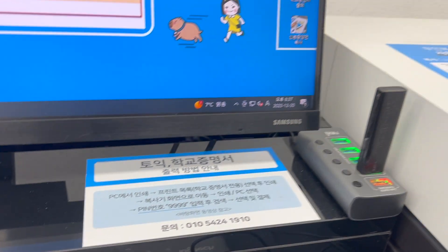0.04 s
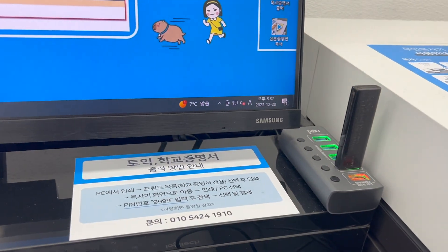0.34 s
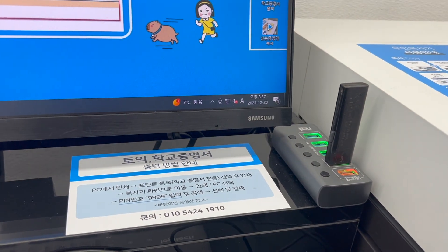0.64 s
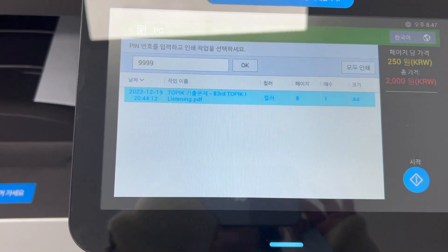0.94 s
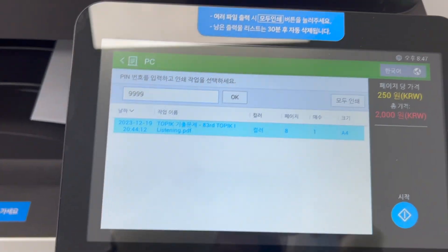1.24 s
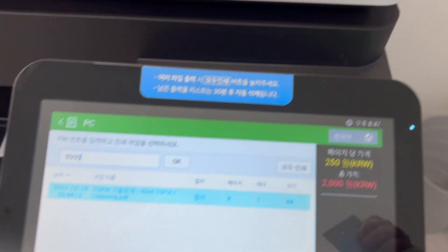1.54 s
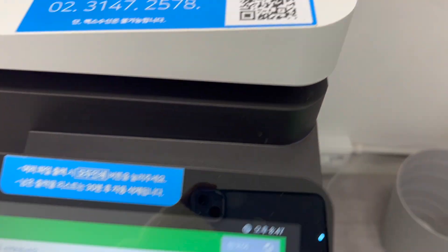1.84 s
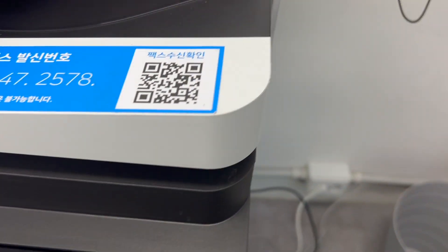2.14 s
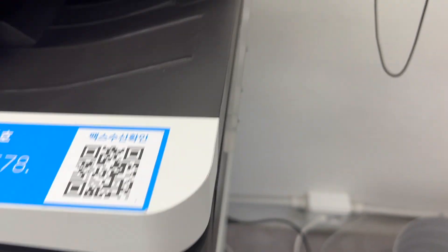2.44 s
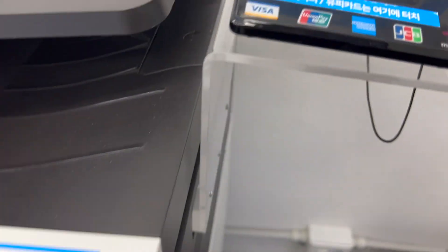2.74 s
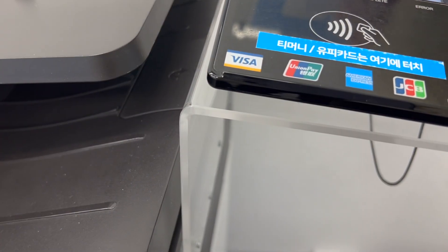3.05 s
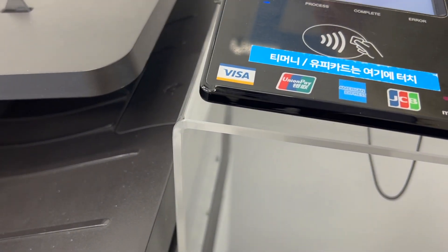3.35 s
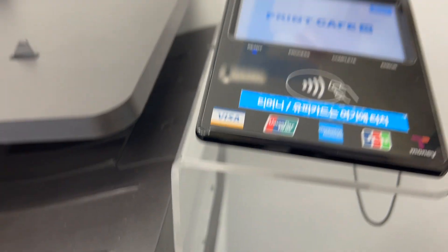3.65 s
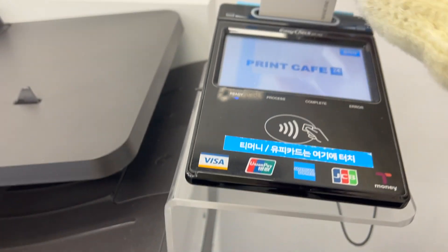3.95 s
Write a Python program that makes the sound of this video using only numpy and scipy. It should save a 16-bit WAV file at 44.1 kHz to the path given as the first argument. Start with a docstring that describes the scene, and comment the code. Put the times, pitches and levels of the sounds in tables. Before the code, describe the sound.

A copier whirs and whines close by, following a moment of soft ventilation hum in a small shop. Its motors start and stop as rollers feed a sheet, with dull knocks, sharp plastic clicks and a brief squeaky paper scrape.

```python
"""A small print shop heard from a hand-held phone. First a quiet room hum and a fading hiss, with one
sharp click at 0.7 s. After a brief silence, a copier from close by: fans and a drive whine run, motors
start and stop, rollers whir, paper slides through, and plastic parts click and thud. From 3.3 s the
paper scrapes and squeaks; near 3.7 s the whine drops away."""
import sys
import numpy as np
from scipy import signal
from scipy.fft import rfft, irfft
from scipy.io import wavfile
from scipy.ndimage import uniform_filter1d

SR = 44100
rng = np.random.default_rng(int(sys.argv[2]) if len(sys.argv) > 2 else 0)


def generate_wav(signal):
    """Clip the signal to [-1, 1] and save it as 16-bit WAV at the path in sys.argv[1]."""
    frames = np.transpose(np.atleast_2d(signal))
    scaled = np.clip(frames, -1, 1) * 32767
    pcm = np.round(scaled).astype(np.int16)
    wavfile.write(sys.argv[1], SR, pcm)


N = 176400
T = np.arange(N) / SR
HZ = np.maximum(np.arange(N // 2 + 1) * SR / N, 1)


# roller spectrum (frequency [Hz], density [dB])
ROLLER_SPECTRUM = [(50, -12), (92, 3), (125, -6), (170, -7), (260, 5.5), (450, -2), (620, -2.5), (800, -5),
                   (1150, -7), (1500, -16), (2500, -26.5), (6000, -61)]
# roller whir (time [s], level [dB])
ROLLER_LEVEL = [(.82, -41), (1.07, -44.5), (1.25, -46), (1.42, -44.5), (1.52, -44.5), (1.6, -44.5),
                (1.85, -47), (2.05, -46), (2.25, -47), (2.38, -43.5), (2.5, -43), (2.62, -47),
                (2.78, -44.5), (2.92, -51), (3.5, -49.5), (4, -57)]

def rollers():
    """Feed rollers rattle finely into a whir."""
    return curve(ROLLER_LEVEL) * noise(response(ROLLER_SPECTRUM), grain=0.39)


# motor runs (start [s], end [s], pitch [Hz], level [dB], run-down [s], pitch lost [fraction])
MOTOR_RUNS = [(.8, 1.12, 865, -54.5, .03, .01), (.8, 1.1, 490, -52, .03, .01),
              (1.02, 1.48, 515, -50.5, .03, .002), (1.56, 1.99, 517, -49, .29, .09),
              (.8, 1.17, 330, -49.5, .03, .005), (1.15, 1.48, 333.5, -43, .05, .005),
              (1.46, 1.8, 334, -51, .2, .02), (2.1, 2.28, 333, -47.5, .04, .01),
              (1.79, 1.96, 260, -46, .05, .02), (1.93, 2.06, 224, -47.5, .1, .04),
              (2.21, 2.32, 260, -47, .05, .01), (2.45, 2.57, 262, -42, .03, .005),
              (2.56, 2.74, 263, -51, .05, .01), (2.42, 2.74, 624, -52, .04, .01),
              (2.73, 3.0, 115, -47.5, .15, .02), (3.1, 3.66, 116, -50, .35, .07),
              (3.7, 4.1, 204, -55, .05, .01), (.95, 1.78, 3110, -69, .05, .002)]

def motors():
    """Each motor comes in, holds its speed and sags as it stops."""
    out, attack_s, release_s = 0, 0.025, 0.03
    for start, end, hz, db, run_down_s, sag in MOTOR_RUNS:
        slowing = ramp(end - run_down_s, run_down_s)
        gate = ramp(start, attack_s) * np.clip((end - T) / release_s, 0, 1)
        out += undb(db) * gate * tone(hz * (1 - sag * slowing ** 2), wow=0.0045, flutter_db=2.2)
    return out


# sliding paper spectrum (frequency [Hz], density [dB])
PAPER_SPECTRUM = [(400, 1.5), (1200, 9), (2200, 2.5), (3200, 0.5), (4500, -2), (7000, 0), (10000, -6),
                  (15500, -2.5)]
# sliding paper (time [s], level [dB])
PAPER_LEVEL = [(.82, -56), (1.3, -57.5), (1.5, -48), (1.58, -50.5), (1.65, -45.5), (1.72, -54.5),
               (1.88, -57.5), (2.05, -53), (2.13, -54.5), (2.25, -55), (2.33, -52), (2.75, -50),
               (2.88, -53), (3.05, -62), (3.3, -60), (3.65, -56.5), (3.72, -58), (3.82, -63.5)]

def paper_slide():
    """The sheet hisses as it slides through."""
    return curve(PAPER_LEVEL) * noise(response(PAPER_SPECTRUM), grain=0.11)


# flick spectrum (frequency [Hz], density [dB])
FLICK_SPECTRUM = [(800, -6), (2000, 14.5), (4500, 13), (8000, 12), (13000, 9.5), (15800, -15)]
# edge flicks (time [s], level [dB], decay [s], extra treble [dB])
EDGE_FLICKS = [(1.535, -38, 0.011, 10), (1.633, -48, .012, -4), (1.65, -45, 0.015, -3),
               (2.157, -43.5, 0.042, -14), (3.392, -39.5, 0.0045, 3), (3.412, -46, 0.01, 6),
               (3.545, -38, .003, 5), (3.558, -47, 0.0063, 5), (3.5645, -40, .003, 3)]

def paper_flicks():
    """The sheet's edge snaps past guides, some flicks crisper than others."""
    out, rise_s, treble_hz = 0, 0.00078, 7800
    grit = noise(response(FLICK_SPECTRUM), grain=0.35)
    treble = irfft(rfft(grit) / (1 + (treble_hz / HZ) ** 4), N)
    for start, db, tau_s, treble_db in EDGE_FLICKS:
        scratch = unit(grit + (undb(treble_db) - 1) * treble)
        out += undb(db) * ramp(start, rise_s) * decay(start, tau_s) * scratch
    return out


# grit of scrapes and click cracks (frequency [Hz], density [dB])
GRIT_SPECTRUM = [(500, -2.5), (1500, 2.5), (2400, -10.5), (3300, -5.5), (4300, -2), (5400, -2),
                 (7500, -7.5), (10000, -9.5), (15500, -17)]
# strokes (start [s], length [s], grit level [dB], squeak [Hz], squeak level [dB])
SCRAPE_STROKES = [(3.343, 0.086, -55, 4400, -63), (3.39, 0.054, -49.5, 5140, -50),
                  (3.415, 0.018, -61, 7030, -48.5), (3.453, 0.034, -57.5, 4900, -57),
                  (3.506, 0.049, -49.5, 4980, -47), (3.537, 0.03, -47, 4500, -57),
                  (3.552, 0.017, -61, 6600, -37.5), (3.554, 0.024, -47, 3780, -42),
                  (3.577, 0.019, -46.5, 3840, -41.5), (3.57, 0.022, -44, 2980, -44.5)]

def paper_scrapes():
    """Paper rubs grittily, each stroke with a rough squeak."""
    out, grit = 0, noise(response(GRIT_SPECTRUM), grain=0.4)
    for start, length_s, db, squeak_hz, squeak_db in SCRAPE_STROKES:
        squeak = noise(resonance(squeak_hz, width_hz=380), grain=0.35)
        out += swell(start, length_s) * (undb(db) * grit + undb(squeak_db) * squeak)
    return out


# plastic modes (frequency [Hz], level [dB], t60 [s])
PLASTIC_MODES = [(910, -5, 0.03), (1282, -5.5, 0.02), (1552, -3, 0.018), (1890, -7.5, 0.0024),
                 (4340, -16.5, 0.013), (5230, -5.5, 0.0074), (8600, -23.5, 0.014)]
# contacts (time [s], level [dB], first mode [dB], second mode [dB], bright modes and crack [dB],
# left minus right [dB], pitch [ratio], ring length [ratio])
PLASTIC_CLICKS = [(.223, -51, 8, 4, -11, -6, 0.92, .8), (0.7115, -24, -10, 1, -20.5, 4.5, 0.84, .55),
                  (2.3082, -43, 17, 1, -18, -2, 0.94, 0.47), (3.0492, -16, -14, 0, -3, -1.5, 1.005, 0.94),
                  (3.392, -34, -9, 0, -8, -1, 1, 1.1), (3.589, -18, -0.5, -4, -6, -3, 1, 1.17)]

def clicks():
    """Hard contacts ring the plastic briefly, each with a small crack."""
    contact_s, bright_hz, crack_db, crack_s = 0.00028, 3000, -18, 0.0074
    out, grit = 0, noise(response(GRIT_SPECTRUM))
    for start, db, first_db, second_db, bright_db, pan_db, pitch, stretch in PLASTIC_CLICKS:
        body = 0
        for k, (hz, mode_db, t60_s) in enumerate(PLASTIC_MODES):
            trim_db = first_db * (k == 0) + second_db * (k == 1) + bright_db * (hz > bright_hz)
            body += (-1) ** k * undb(mode_db + trim_db) * ring(start, hz * pitch, t60_s * stretch)
        attack = 1 - decay(start, contact_s)
        crack = undb(crack_db + bright_db) * decay(start, crack_s * stretch) * grit
        out += undb(db) * panned(body * attack + crack, pan_db)
    return out


# housing thuds (start [s], length [s], lower [Hz], lower level [dB], upper [Hz], upper level [dB])
HOUSING_THUDS = [(0.219, 0.061, 64.6, -51, 910, -63), (0.995, 0.088, 306, -49, 565, -44.5),
                 (1.115, 0.047, 174, -42.5, 560, -70), (1.472, 0.074, 344, -43, 645, -42.5),
                 (2.062, 0.14, 96.5, -42, 325, -63), (2.299, 0.031, 396, -38, 1080, -41),
                 (2.423, 0.019, 463, -50, 1070, -48), (2.74, 0.069, 127, -40.5, 312, -39.5),
                 (2.74, 0.036, 720, -44.5, 1550, -48.5), (3.443, 0.25, 209, -50.5, 303, -57)]

def thuds():
    """The housing shudders dully in two broad resonances."""
    out, width_ratio = 0, 0.38
    for start, length_s, lower_hz, lower_db, upper_hz, upper_db in HOUSING_THUDS:
        lower = undb(lower_db) * noise(resonance(lower_hz, width_ratio * lower_hz))
        upper = undb(upper_db) * noise(resonance(upper_hz, width_ratio * upper_hz))
        out += swell(start, length_s) * (lower + upper)
    return out


# panel bumps (time [s], frequency [Hz], level [dB], t60 [s])
PANEL_BUMPS = [(0.7147, 169, -35, 0.034), (2.136, 62, -31, .08), (2.774, 165, -34, 0.07),
               (3.051, 720, -36, 0.034)]

def bumps():
    """Padded knocks swing a panel for a few cycles."""
    return sum(undb(db) * ring(start, hz, t60_s) * ramp(start, rise_s=0.0012)
               for start, hz, db, t60_s in PANEL_BUMPS)


# cooling air spectrum (frequency [Hz], density [dB])
AIR_SPECTRUM = [(25, -2.5), (60, 2.5), (120, 3), (220, 0), (400, -2.5), (700, -13), (1100, -13),
                (1700, -19), (2300, -26), (4000, -30.5), (8000, -35), (15000, -42.5)]
# fan tones (frequency [Hz], level [dB])
FAN_PARTIALS = [(177.6, -60), (403.7, -62), (522.2, -63), (585, -66), (624.5, -66.5), (699.8, -62.5),
                (888, -68), (1470, -68.5), (2162, -76), (3817, -85.5), (4161, -81.5)]

def fans():
    """Cooling air rushes under the tones of the fans."""
    tones = sum(undb(db) * tone(hz, wow=0.00161, flutter_db=3) for hz, db in FAN_PARTIALS)
    return undb(-49) * noise(response(AIR_SPECTRUM)) + tones


# whine harmonics (multiple, level [dB])
WHINE_HARMONICS = [(1, -61), (2, -69), (4, -74)]
# whine envelope (time [s], gain [dB])
WHINE_GAIN = [(1.9, -3), (2.3, -4), (2.8, -3), (3.67, -.5), (3.75, -22)]

def drive_whine():
    """The drive whines and throbs; the casing rings around its pitch."""
    pitch_hz = 1728
    whine = sum(undb(db) * tone(k * pitch_hz, wow=0.0005, flutter_db=2) for k, db in WHINE_HARMONICS)
    throb = 1 + 0.26 * drift(rate_hz=45)
    casing = undb(-60.5) * noise(resonance(hz=1720, width_hz=85))
    return (whine * throb + casing) * curve(WHINE_GAIN)


# ventilation spectrum (frequency [Hz], density [dB])
VENT_SPECTRUM = [(25, -26), (60, 4), (130, -4), (280, -4), (420, -11.5), (800, -17), (1600, -16.5),
                 (2300, -36.5), (4500, -38), (8000, -51), (15000, -33)]
# ventilation hum (frequency [Hz], level [dB])
VENT_HUM = [(183, -52.5), (277, -62), (743, -76.5), (1017, -69), (1523, -70.5)]
# fading hiss (time [s], level [dB])
HISS_LEVEL = [(0, -50), (.07, -55), (.16, -64.5), (.3, -69)]

def room():
    """Ventilation rumble and hum, with a hiss that fades."""
    hum = sum(undb(db) * tone(hz, wow=0.0014, flutter_db=1.5) for hz, db in VENT_HUM)
    rumble = undb(-51) * noise(response(VENT_SPECTRUM))
    hiss = curve(HISS_LEVEL) * noise(response(PAPER_SPECTRUM))
    return rumble + panned(hum, pan_db=4.5) + hiss


def with_walls(x):
    """The shop's walls add short reflections."""
    delay_s, t60_s, wet_db = 0.012, 0.3, -17
    tail = unit(rng.standard_normal((2, N)) * decay(delay_s, t60_s / np.log(1000))) / np.sqrt(N)
    return x + undb(wet_db) * irfft(rfft(x) * rfft(tail), N)


# port phase at the desk (frequency [Hz], left lead [rad])
DESK_LEAD = [(0, 0), (700, 0), (1000, -1.9), (1500, -1.9), (1850, .4), (2800, 1.4), (4800, .2), (7300, 0),
             (9700, -3.1), (12800, -6.3), (15700, -9.4)]
# port phase at the copier (frequency [Hz], left lead [rad])
COPIER_LEAD = [(0, 0), (200, -.15), (700, -.9), (1400, -.6), (2000, .6), (2650, 2.4), (4000, .8),
               (5000, 1.6), (6050, 3.14), (8100, 6.28), (10250, 9.42), (12600, 12.57), (14850, 15.7),
               (16000, 16.6)]
# port balance (frequency [Hz], left minus right [dB])
PORT_BALANCE = [(110, -1), (380, 2), (700, 0), (1300, -0.2), (8000, -0.5)]

def at_ports(x, lead_rows):
    """Sound reaches the two microphone ports out of step and slightly unequal in level."""
    sides = np.array([[0.5], [-0.5]])
    lead_rad = np.interp(HZ, *np.array(lead_rows).T)
    return irfft(rfft(x) * np.exp(1j * sides * lead_rad) * response(PORT_BALANCE) ** sides, N)


# diffuse noise, unrelated at the two ports (frequency [Hz], relative level [dB])
DIFFUSE_SHARE = [(60, -28), (200, -18.5), (500, -1.5), (1200, -11.5), (2500, 1), (5000, -0.5), (12000, -67)]

def noise(gain, grain=0):
    """Coloured stereo noise, partly diffuse; grain bunches it into millisecond specks."""
    white = rfft(rng.standard_normal((3, N)) * np.exp(grain * drift(rate_hz=900)))
    return unit(irfft((white[0] + white[1:] * response(DIFFUSE_SHARE)) * gain, N))


def tone(hz, wow, flutter_db):
    """A rotating part's tone, slightly unsteady in speed and level."""
    cycles = np.cumsum(hz * (1 + wow * drift(rate_hz=14))) / SR + rng.random()
    return np.sqrt(2) * np.sin(2 * np.pi * cycles) * undb(flutter_db * drift(rate_hz=16))


def ring(start, hz, t60_s):
    """One struck mode dying away."""
    age_s = np.maximum(T - start, 0)
    return np.sin(2 * np.pi * hz * age_s) * np.exp(-np.log(1000) * np.minimum(age_s / t60_s, 2))


def drift(rate_hz):
    """Smooth random drift with a spread near 1."""
    hold = int(SR / rate_hz)
    steps = np.repeat(rng.standard_normal(N // hold + 1), hold)
    return 1.17 * uniform_filter1d(uniform_filter1d(steps, hold), hold)[:N]


def resonance(hz, width_hz):
    """Gain over frequency of one resonance."""
    return 1 / (1 + (2 * (HZ - hz) / width_hz) ** 2)


def response(rows):
    """Gain over frequency from (frequency [Hz], level [dB])."""
    hz, db = np.array(rows).T
    return undb(np.interp(np.log(HZ), np.log(hz), db))


def curve(rows):
    """Gain over time from (time [s], level [dB])."""
    return undb(np.interp(T, *np.array(rows).T))


def ramp(start, rise_s):
    """Linear rise from 0 to 1."""
    return np.clip((T - start) / rise_s, 0, 1)


def swell(start, length_s):
    """Rounded rise and fall."""
    return np.sin(np.pi * ramp(start, length_s)).clip(0) ** 0.41


def decay(start, tau_s):
    """Sudden onset, exponential fall."""
    return (T >= start) * np.exp(-np.maximum(T - start, 0) / tau_s)


def panned(x, pan_db):
    """Place a sound by its left minus right level."""
    return x * undb(np.array([[pan_db], [-pan_db]]) / 2)


def undb(db):
    """Decibels to gain."""
    return 10 ** (np.asarray(db) / 20)


def unit(x):
    """Scale to rms 1."""
    return x / np.sqrt(np.mean(x ** 2))


def scene():
    """The quiet room, a short silence, then the running copier."""
    room_end_s, room_fade_s, copier_start_s = 0.783, 0.0011, 0.8105
    knocks = with_walls(clicks()) + thuds() + bumps()
    desk = at_ports(room() + knocks, DESK_LEAD)
    machine = fans() + drive_whine() + motors() + rollers()
    paper = paper_slide() + paper_flicks() + paper_scrapes()
    copier = at_ports(machine + paper + knocks, COPIER_LEAD)
    desk_gate = np.clip((room_end_s - T) / room_fade_s, 0, 1)
    return desk * desk_gate + copier * ramp(copier_start_s, rise_s=0.025)


def record(dry):
    """The phone thins the deep bass and cuts the top."""
    bass_hz, top_hz = 36, 15850
    thin = signal.sosfilt(signal.butter(3, bass_hz, "high", fs=SR, output="sos"), dry)
    return signal.sosfilt(signal.ellip(10, .1, 80, top_hz, fs=SR, output="sos"), thin)


dry = scene()
out = record(dry)
generate_wav(out)
```